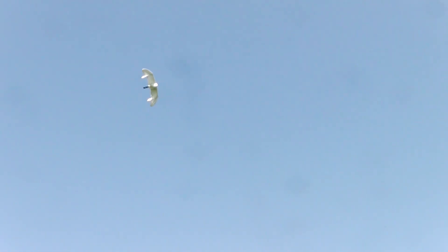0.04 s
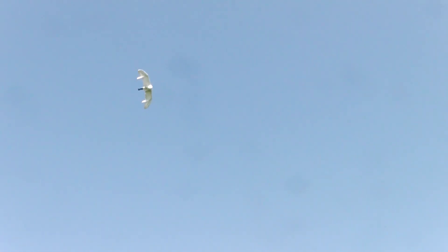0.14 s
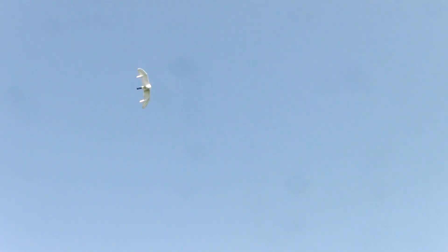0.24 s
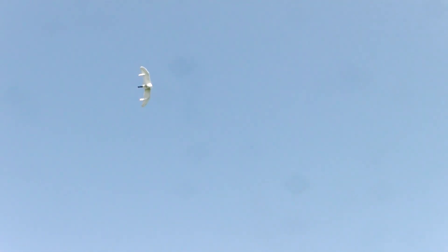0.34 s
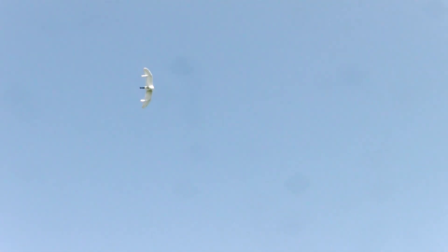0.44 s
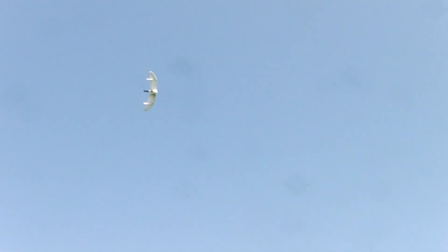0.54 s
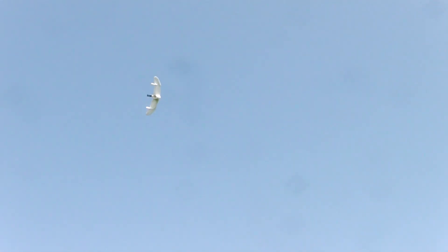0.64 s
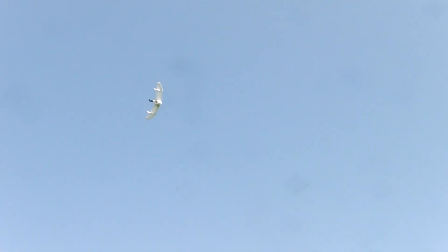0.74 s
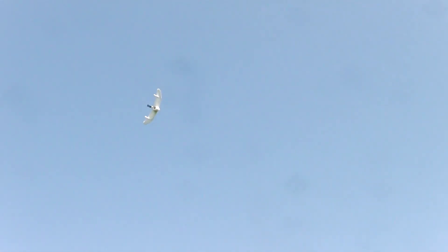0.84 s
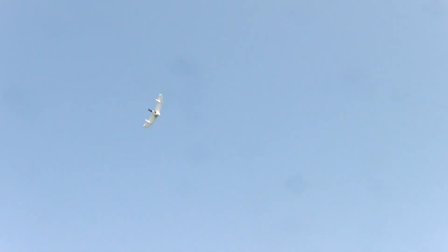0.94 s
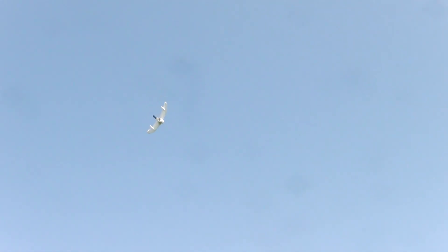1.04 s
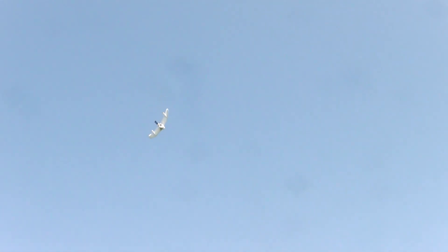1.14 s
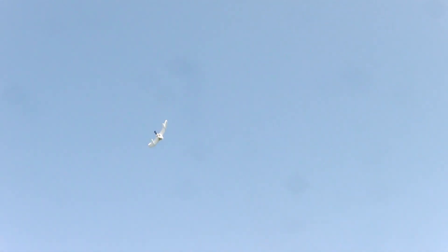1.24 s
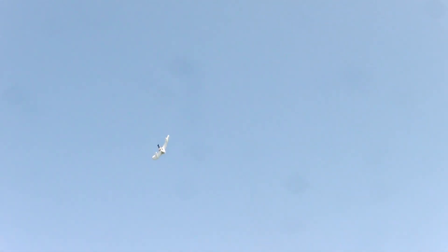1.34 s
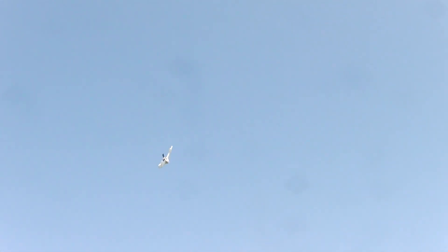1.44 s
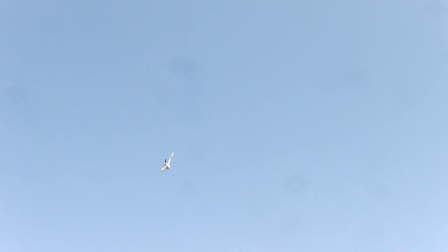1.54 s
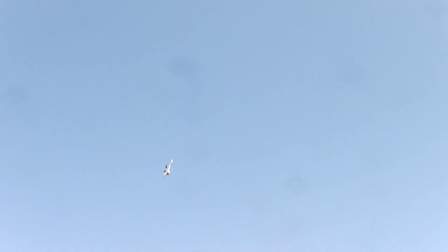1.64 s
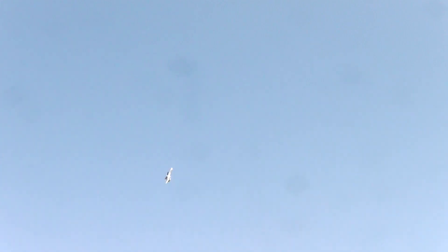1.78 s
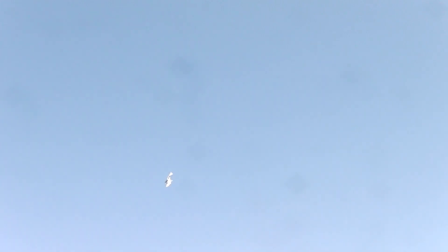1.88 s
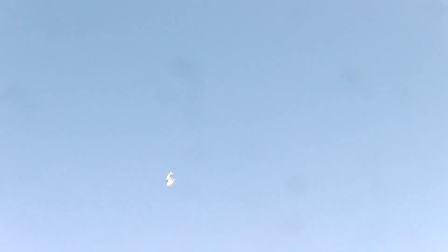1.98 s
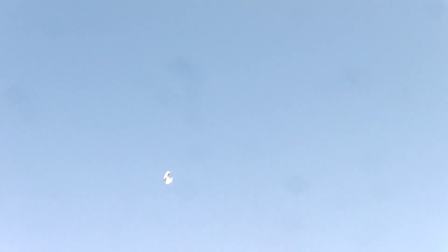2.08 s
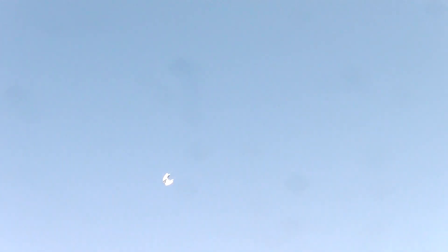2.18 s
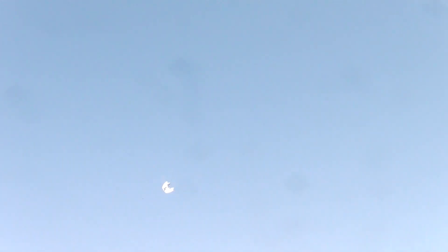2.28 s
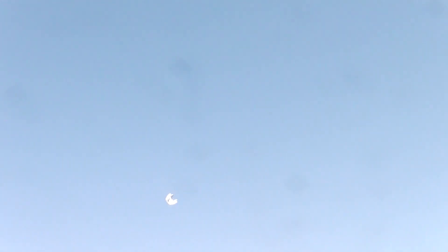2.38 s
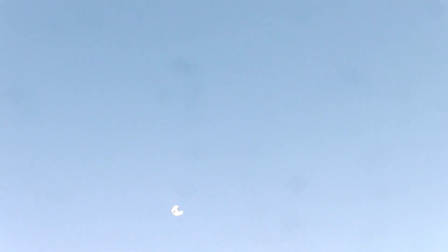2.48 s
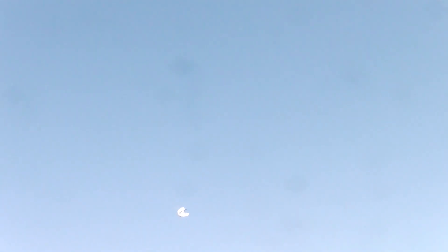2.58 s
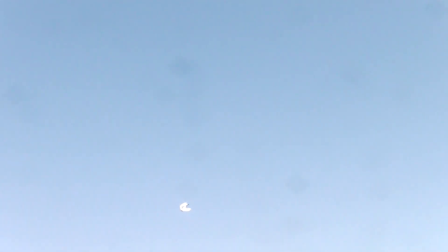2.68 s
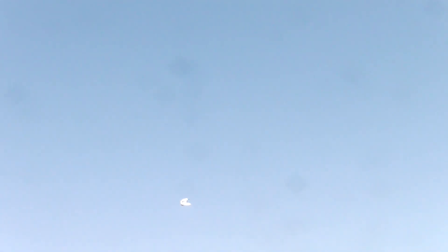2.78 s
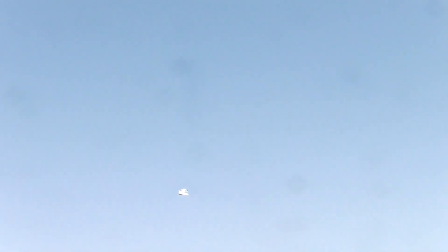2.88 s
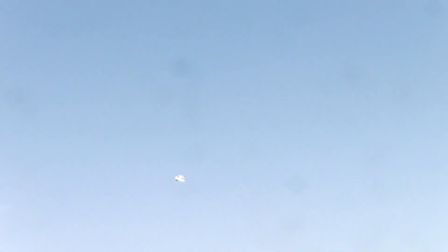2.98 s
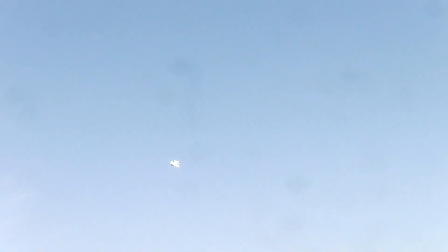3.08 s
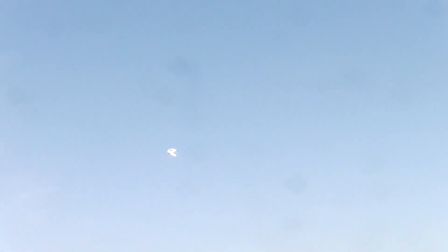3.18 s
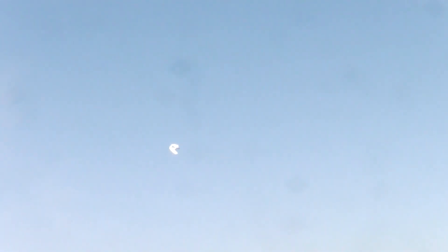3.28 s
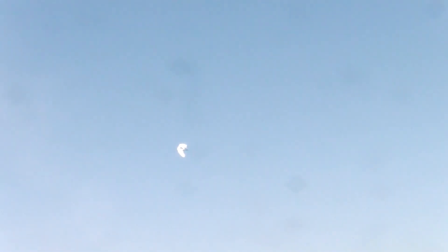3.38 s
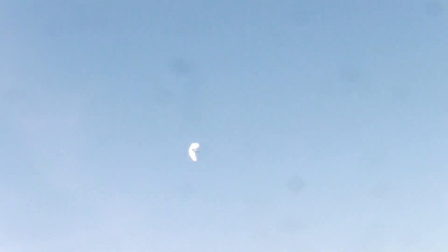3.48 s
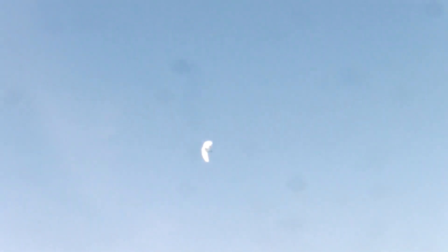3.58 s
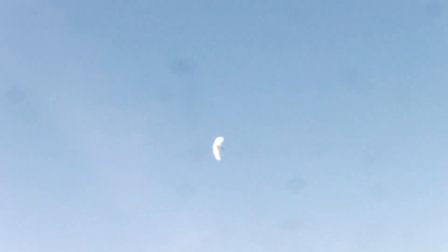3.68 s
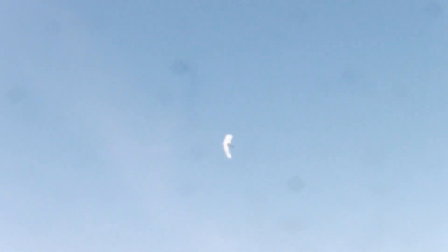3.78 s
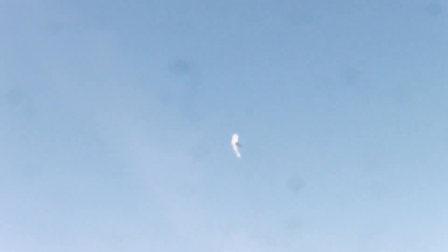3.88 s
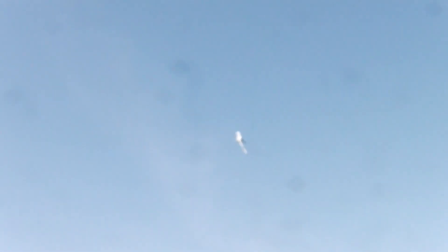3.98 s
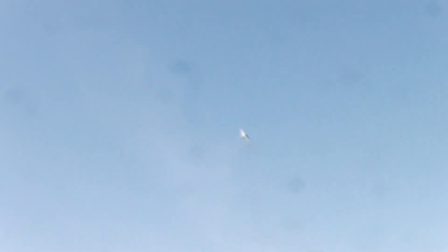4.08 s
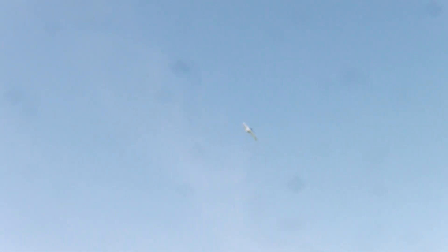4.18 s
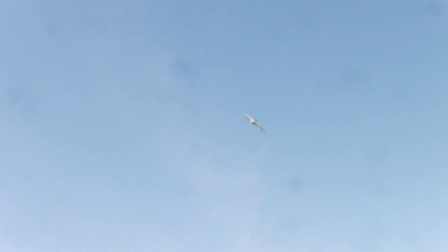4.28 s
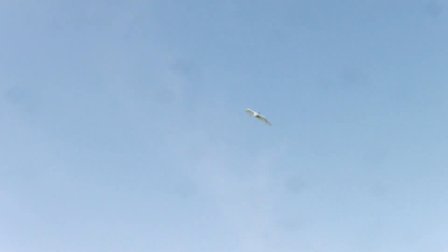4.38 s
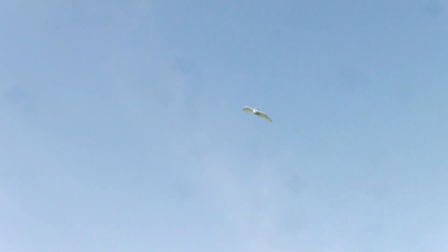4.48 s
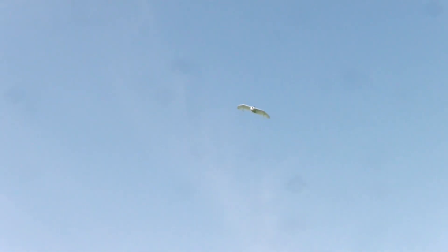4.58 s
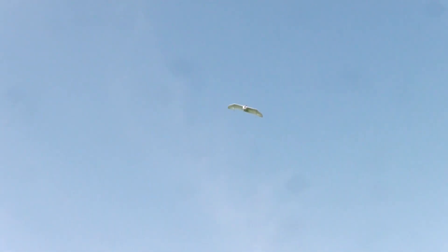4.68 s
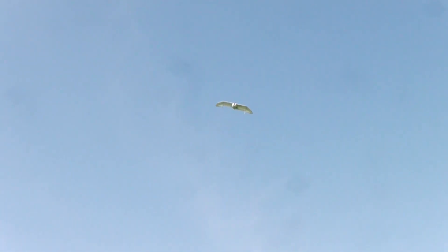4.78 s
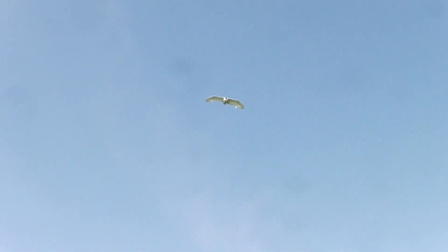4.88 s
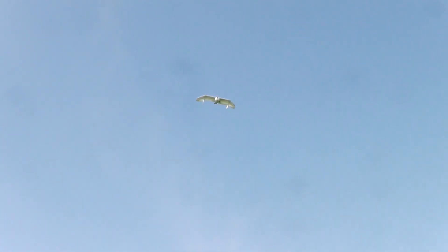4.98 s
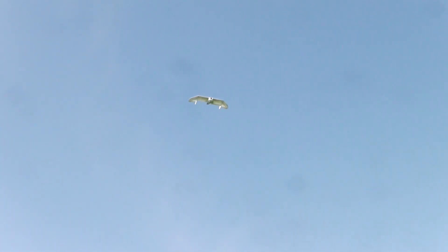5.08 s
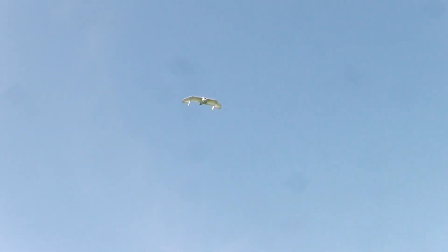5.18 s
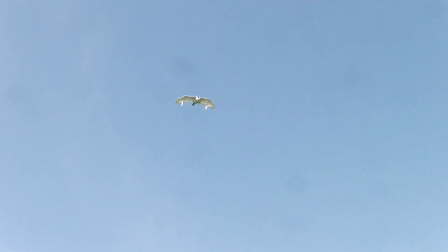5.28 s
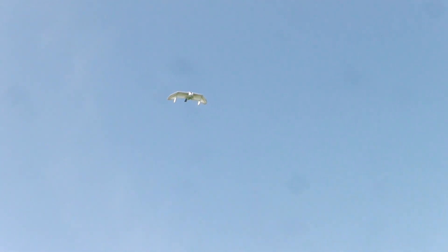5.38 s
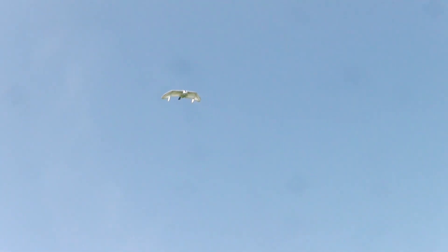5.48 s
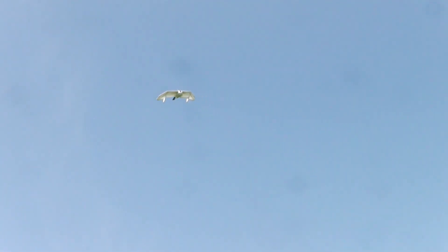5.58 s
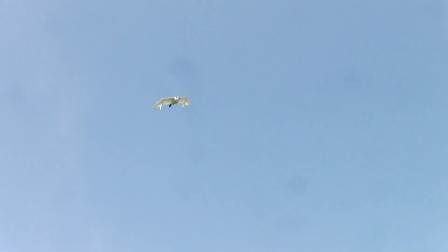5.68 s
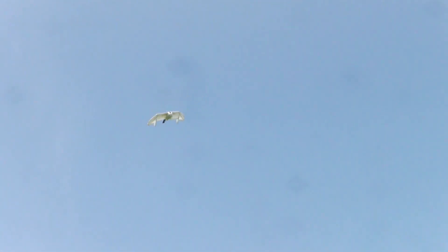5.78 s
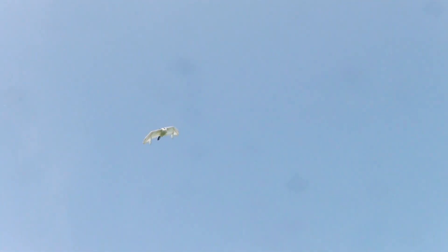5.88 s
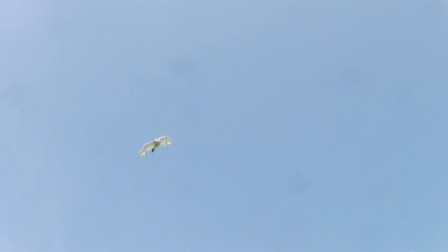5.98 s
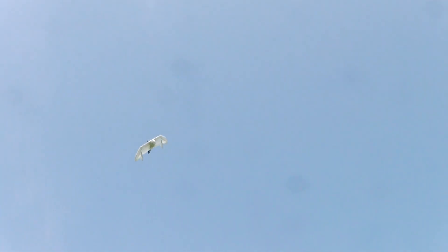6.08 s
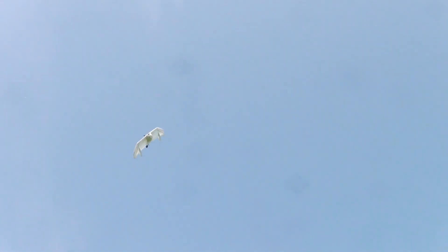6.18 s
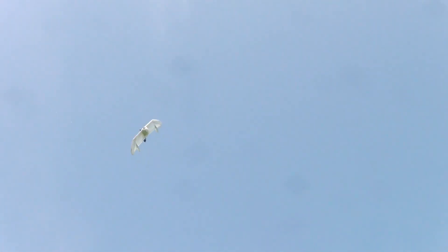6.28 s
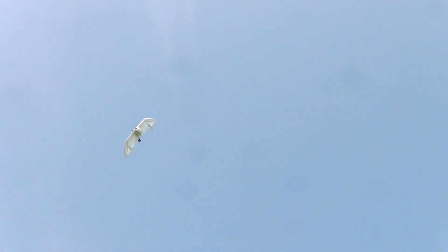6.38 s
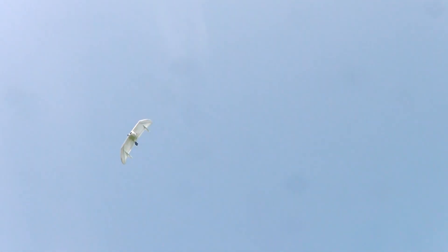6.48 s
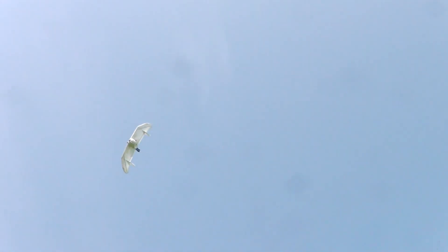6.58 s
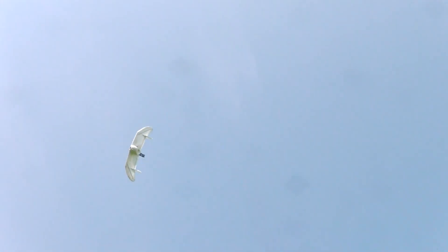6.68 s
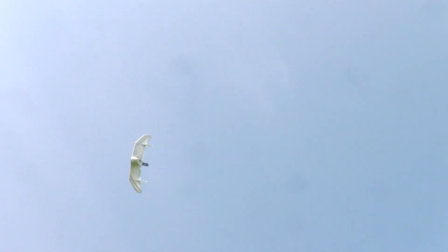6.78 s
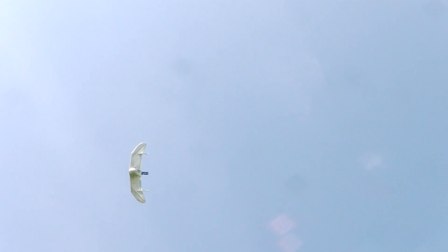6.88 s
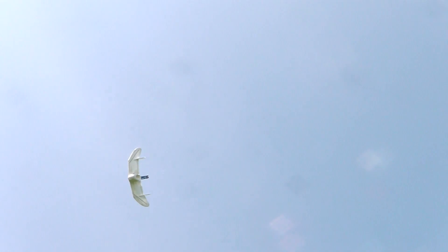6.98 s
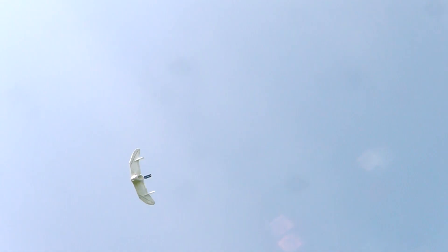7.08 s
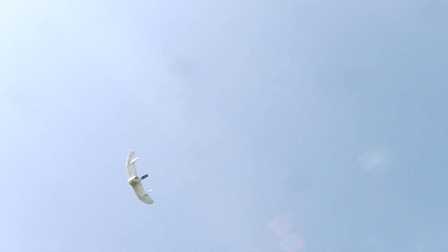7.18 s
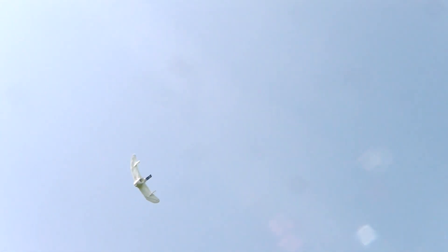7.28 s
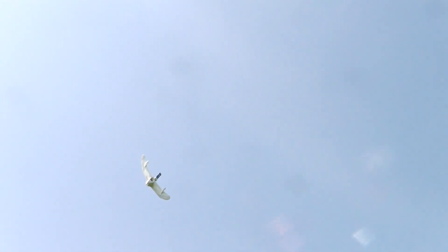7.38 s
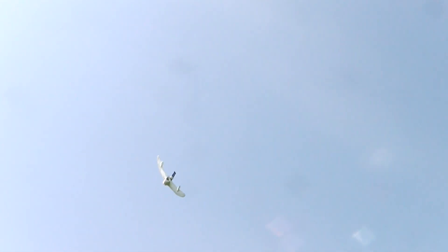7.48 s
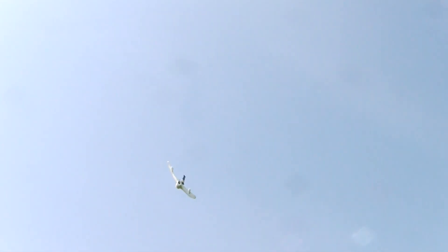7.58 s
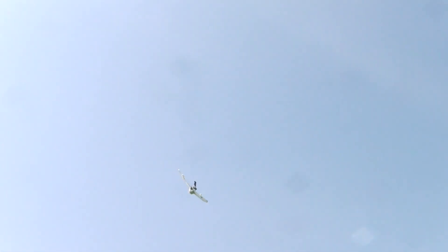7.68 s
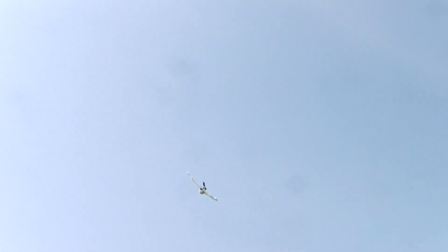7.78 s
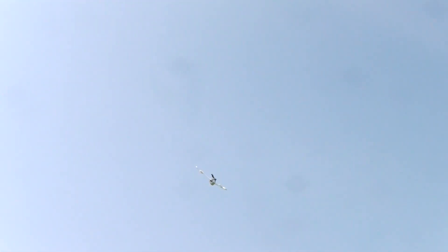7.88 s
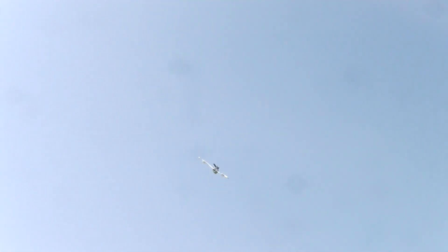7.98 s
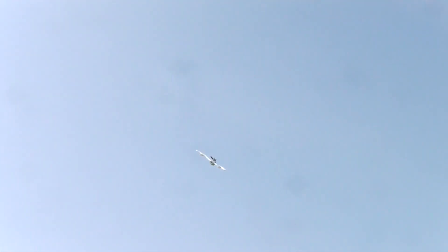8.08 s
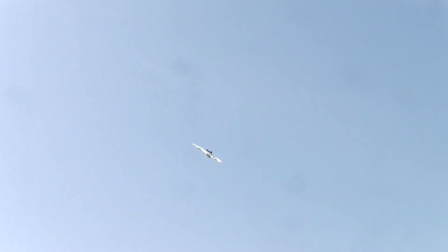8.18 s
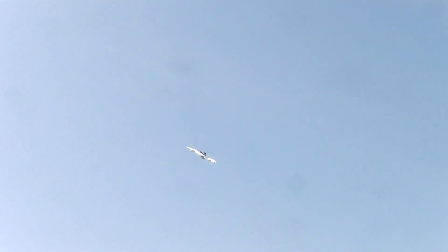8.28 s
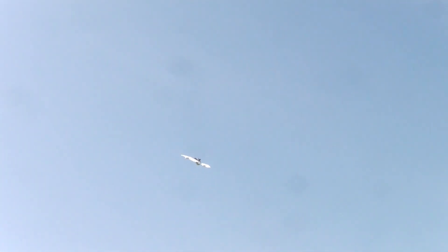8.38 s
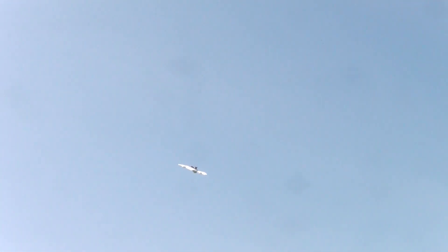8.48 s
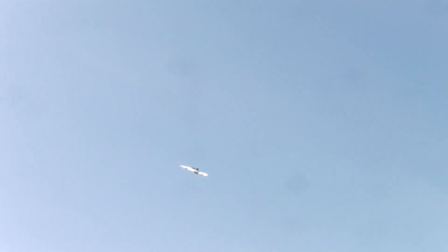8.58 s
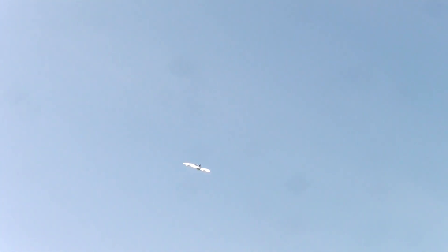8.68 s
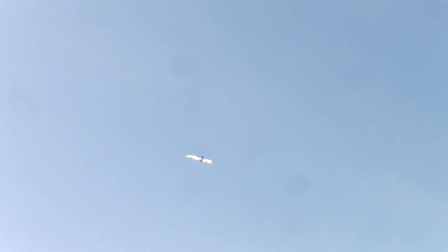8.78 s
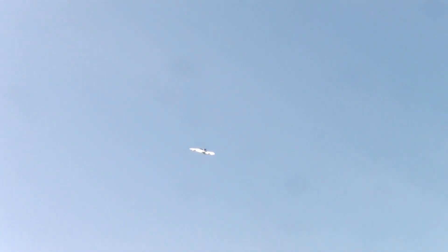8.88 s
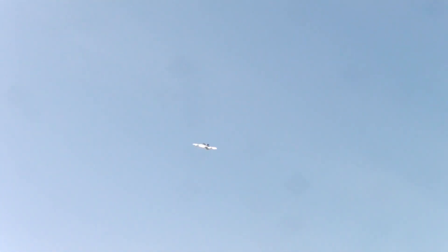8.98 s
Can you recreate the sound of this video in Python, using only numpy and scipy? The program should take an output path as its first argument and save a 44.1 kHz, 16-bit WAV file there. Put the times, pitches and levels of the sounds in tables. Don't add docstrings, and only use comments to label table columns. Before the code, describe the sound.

A small electric ducted-fan model aircraft flies circles over a meadow, heard from a low stereo microphone. From 0 to 1.6 seconds a steady mid-pitched whine, with a low hum and overtones, rides on airy roar and bright hiss. By 2 seconds it sags and thins; at about 2.2 it sweeps quickly upward, staying higher but fairly soft, with a small dip near 3.4. From 4 seconds it settles slightly lower and swells, hum, whine and hiss strongest around 6.5 to 7.4. Its ground reflection gives the rush a shifting hollow colour. Pitch then slides down, levels briefly near 8.2, and from 8.45 the motor runs down, fading by 9. A lark whistles short repeated high phrases from 0.6 to 4 seconds, then rapid chirps and trills from 7.9. Six faint hoarse rising calls come between 7.8 and 9. Distant traffic drones throughout.

```python
import sys
import numpy as np
from scipy import signal
from scipy.fft import rfft, irfft, next_fast_len
from scipy.io import wavfile
from scipy.ndimage import uniform_filter1d, map_coordinates

SR = 44100
rng = np.random.default_rng(int(sys.argv[2]) if len(sys.argv) > 2 else 0)


def pcm_store(signal):
    levels = np.round(np.clip(np.atleast_2d(signal), -1, 1) * 32767)
    wavfile.write(sys.argv[1], SR, levels.astype(np.int16).T)


def ratio_of_db(decibels):
    return 10 ** (np.asarray(decibels, float) / 20)


N = 399105

# pitch_hz, density_db (per Hz)
TRAFFIC_SPECTRUM = [(20, -14), (38, -7), (55, -6), (68, -2.5), (85, -10.5), (150, -20.5), (190, -23.5),
                    (600, -32), (2000, -23.5), (2600, -48), (5000, -46), (15700, -54)]
# time_s, level_db
FAR_CALLS = [
    (7.85, -44),
    (8.051, -44),
    (8.275, -43.5),
    (8.485, -42),
    (8.699, -42),
    (8.899, -43),
]

# time_s (from its start), pitch_hz
SLIDE = [(0, 6600), (.025, 5800), (.1, 5150), (.165, 4750), (.2, 4300)]
PEAK = [(0, 5750), (.024, 5600), (.035, 6250)]
RISE = [(0, 4550), (.012, 5200), (.045, 6500)]
ARCH = [(0, 4200), (.01, 5000), (.024, 5200), (.038, 6250), (.06, 5400), (.07, 4000)]
HOOK = [(0, 5400), (.008, 6250), (.015, 6400), (.025, 5950)]
SWOOP = [(0, 5600), (.026, 5330), (.048, 6900), (.062, 5900), (.08, 5300), (.087, 4300)]
DROP = [(0, 6000), (.014, 4900)]
TURN = [(0, 5400), (.008, 5700), (.015, 3800), (.02, 4900), (.04, 3900)]
STAIR = [(0, 5900), (.006, 6300), (.014, 6350), (.024, 6100), (.03, 5100)]
CURL = [(0, 5000), (.03, 4450), (.045, 4700), (.062, 5900), (.098, 4300)]
HOLD = [(0, 6200), (.01, 6400), (.025, 6350)]
FALL = [(0, 6400), (.012, 5700), (.032, 5100)]
# syllable, start_s, repeats, spacing_s, pitch_ratio, ratio_per_repeat
SONG = [(SLIDE, 1.62, 3, .282, 1, 1), (PEAK, 2.456, 4, .142, 1, 1), (FALL, 2.506, 4, .142, 1, 1),
        (RISE, 3.028, 8, .0928, 1, 1), (RISE, 3.78, 3, .1, 1, 1), (CURL, .645, 3, .152, 1, 1),
        (STAIR, 7.9, 1, 0, 1.1, 1), (HOLD, 7.935, 1, 0, 1, 1), (ARCH, 8.068, 1, 0, 1, 1),
        (HOOK, 8.195, 1, 0, 1.04, 1), (HOOK, 8.225, 6, .0304, 1, .974), (RISE, 8.468, 1, 0, .9, 1),
        (SWOOP, 8.487, 1, 0, 1, 1), (DROP, 8.623, 4, .0147, 1, 1), (HOLD, 8.678, 1, 0, 1, 1),
        (TURN, 8.7, 1, 0, 1, 1), (STAIR, 8.937, 1, 0, 1, 1), (HOOK, 8.965, 3, .02, .9, .93),
        (HOLD, 9.025, 1, 0, .645, 1)]
SONG_DB = [-45, -41, -42, -41, -42, -46, -58, -43, -41, -50, -42.5, -48, -38, -40, -44, -41, -45.5, -43.5,
           -46]
# start_s, length_s, start_hz, end_hz, swing_hz, beat_hz, level_db
TRILLS = [
    (7.968, .048, 6150, 5900, 250, 330, -46),
    (8.777, .102, 4450, 4450, 750, 95, -42),
    (8.88, .07, 3000, 4500, 400, 300, -54),
]

# time_s, roar_db, hump_db, wake_db, jet_db
AIR_LEVELS = [(0.0, -46.5, -48, -44.5, -44), (0.31, -47.5, -40, -43.5, -39.5),
              (0.73, -46.5, -43, -43, -40.5), (1.36, -52.5, -46, -43, -40.5), (1.67, -52, -49, -46, -48.5),
              (1.88, -57, -54, -51.5, -55.5), (2.09, -56.5, -51, -55, -56), (2.3, -53, -56, -46, -50),
              (2.61, -51.5, -70, -47, -47.5), (3.03, -48.5, -73, -43, -47), (3.34, -59, -66, -49.5, -48.5),
              (3.66, -51, -67, -45, -46.5), (3.76, -48, -57, -47, -46), (3.97, -51.5, -57, -40.5, -40),
              (4.39, -50.5, -46.5, -38.5, -37), (5.02, -46.5, -42.5, -37, -37.5),
              (6.69, -43, -42, -38, -35.5), (6.9, -39.5, -63, -37.5, -36.5), (7.31, -43.5, -42, -43, -36.5),
              (7.52, -46.5, -44, -40, -38.5), (7.84, -56.5, -55, -46, -42.5), (8.15, -56.5, -57, -49, -52),
              (8.36, -56, -57, -47.5, -48), (8.57, -61, -55, -50, -53), (8.67, -53, -60, -55, -61),
              (8.88, -64, -63, -59, -63), (8.99, -70, -67, -62, -68)]
# time_s, lag_ms
GROUND_ECHO = [(0, 6.7), (1, 6.34), (1.6, 5.6), (2.3, 3.56), (3.3, 2.8), (4, 4.08), (4.8, 4.93),
               (5.6, 6.85), (6.3, 8), (6.9, 8.9), (8, 5.33), (9.05, 4.2)]
# pitch_hz, density_db (per Hz)
ROAR_SPECTRUM = [(150, -24.5), (260, -6.5), (600, 1), (1100, -3), (2000, -6.5), (2600, -17.5), (3300, -17)]
# pitch_hz, density_db (per Hz)
WAKE_SPECTRUM = [(2300, -14.5), (3300, -14.5), (4300, -2), (5800, -0.5), (7000, -7), (8500, -9)]
# pitch_hz, density_db (per Hz)
JET_SPECTRUM = [(6000, -24), (7500, -5.5), (9000, -2.5), (10800, -2.5), (12500, -11.5), (15700, -19)]
# time_s, turns_hz
SHAFT_SPEED = [(0.0, 370.7), (0.53, 369.1), (0.8, 365.0), (1.62, 361.1), (1.66, 355.6), (1.74, 339.7),
               (1.78, 334.5), (1.89, 325.1), (1.95, 322.5), (2.09, 322.4), (2.15, 324.2), (2.17, 327.0),
               (2.19, 332.3), (2.22, 342.9), (2.26, 359.9), (2.33, 398.6), (2.35, 407.7), (2.38, 418.1),
               (2.43, 431.7), (2.45, 435.2), (2.52, 442.8), (2.65, 448.1), (2.78, 447.1), (2.87, 448.9),
               (3.05, 446.4), (3.09, 444.5), (3.21, 434.6), (3.38, 430.6), (3.54, 432.7), (3.67, 446.0),
               (3.74, 450.4), (3.93, 451.0), (3.95, 449.7), (4.02, 437.8), (4.11, 432.3), (4.21, 430.1),
               (4.46, 428.5), (4.58, 422.3), (4.69, 419.7), (4.87, 422.2), (5.78, 419.3), (5.87, 421.2),
               (6.25, 420.3), (6.36, 423.1), (6.56, 423.8), (6.83, 422.1), (6.86, 420.0), (6.94, 404.7),
               (7.09, 390.8), (7.18, 386.3), (7.48, 378.3), (7.61, 362.1), (7.7, 342.3), (7.74, 335.4),
               (7.82, 325.6), (7.9, 318.6), (8.01, 312.7), (8.13, 309.3), (8.31, 308.6), (8.42, 309.7),
               (8.45, 306.5), (8.47, 300.6), (8.56, 266.9), (8.64, 232.6), (8.67, 221.2), (8.7, 211.4),
               (8.77, 194.7), (8.86, 176.0), (9.02, 146.0), (9.04, 143.1)]
# time_s, order1_db, order2_db, order3_db, order4_db, order5_db, order10_db, order15_db, order20_db
TONE_LEVELS = [(0.0, -34, -43, -43, -37.5, -42, -57, -43, -49),
               (0.09, -31, -39.5, -44, -40, -34, -53.5, -52, -50),
               (0.45, -32, -36, -47, -49, -27, -46, -50, -49),
               (0.57, -32, -35.5, -44, -70, -29, -55, -50, -45),
               (0.66, -30, -33.5, -55, -49, -33, -61, -52, -51),
               (0.84, -28, -38, -48, -41.5, -33, -52, -43, -43),
               (0.96, -26, -41, -46, -38, -50, -49, -57, -43.5),
               (1.14, -26, -43, -51, -37.5, -34, -46, -42.5, -47),
               (1.32, -27, -52, -55, -47, -51, -51, -41.5, -54),
               (1.44, -31, -46, -45, -38.5, -34, -53, -46, -49),
               (1.62, -39, -40.5, -47, -45, -43, -67, -48, -52),
               (1.68, -40, -45.5, -59, -48, -37, -66, -49, -52),
               (1.86, -52, -35.5, -50, -54, -45, -64, -66, -64),
               (1.95, -70, -37, -58, -46, -59, -59, -54, -63),
               (2.07, -54, -39, -45, -70, -48, -54, -53, -58),
               (2.16, -52, -37.5, -46, -55, -58, -69, -68, -68),
               (2.25, -64, -40, -44.5, -55, -46, -57, -50, -59),
               (2.37, -40, -46, -54, -43, -52, -45, -48, -50),
               (2.43, -39, -40, -47.5, -48, -53, -49, -56.5, -50),
               (2.97, -41, -43, -48, -49, -51, -44, -45, -53),
               (3.15, -52, -47, -45.5, -49, -46, -45.5, -63, -70),
               (3.36, -46, -61, -41.5, -51, -47, -49, -49, -59),
               (3.54, -37, -38, -52, -57, -50, -52, -63, -66),
               (3.63, -37, -42, -49, -46, -61, -46.5, -51, -48),
               (3.87, -42, -68, -40.5, -44, -60, -44.5, -45, -61),
               (4.14, -32, -63, -57, -44, -47, -44, -50, -48),
               (4.23, -31, -55, -54, -46, -60, -40, -39, -43),
               (4.53, -24, -44.5, -45.5, -45, -43, -45, -53, -34),
               (4.68, -21, -52, -46, -41, -44, -43, -52, -42.5),
               (4.8, -20, -65, -65, -53, -44, -47, -43, -37),
               (4.98, -20, -63, -41.5, -43, -48, -46.5, -46, -44),
               (5.19, -31, -46, -39.5, -53, -36, -47, -48, -40),
               (5.28, -30, -39, -51, -46, -44, -47, -45, -42),
               (5.43, -24, -40, -50, -48, -34, -43.5, -42, -52),
               (5.55, -24, -49, -41.5, -62, -42, -42, -41, -52),
               (5.67, -26, -51, -44, -41, -33, -44.5, -44, -42),
               (5.82, -28, -42, -48, -47, -43, -41, -42, -41),
               (5.91, -30, -40, -39.5, -40, -33, -40, -42, -38),
               (6.12, -40, -54, -41, -39, -33, -45, -40, -38),
               (6.3, -32, -40, -47, -38, -38, -44.5, -40, -36.5),
               (6.39, -30, -38, -40, -48, -36, -38, -39, -33),
               (6.48, -26, -29.5, -47, -45, -37, -39.5, -37, -51),
               (6.57, -23, -38, -37, -68, -32, -37, -49, -43),
               (6.69, -20, -39.5, -34.5, -47, -31, -36, -37, -41),
               (6.78, -18, -40, -32.5, -45, -30, -39, -50, -37),
               (6.9, -21, -42, -43, -35, -35, -39.5, -41, -42),
               (6.99, -35, -46, -42, -40, -37, -49, -52, -41),
               (7.11, -19, -48, -49, -34, -40, -45, -47, -48),
               (7.23, -16, -42, -66, -37.5, -36, -51, -48, -41),
               (7.29, -17, -38, -46, -35, -27, -45, -50, -38),
               (7.35, -18, -48, -43, -35, -28, -45, -53, -43),
               (7.38, -19, -39, -41, -42, -34, -43, -51, -48),
               (7.44, -22, -53, -43, -37, -27, -43, -46, -52),
               (7.59, -43, -42, -41.5, -32.5, -45, -40.5, -46, -46),
               (7.74, -39, -45.5, -39, -51, -52, -53, -49, -47.5),
               (7.95, -38, -46, -49, -48, -58, -64, -48.5, -58),
               (8.31, -39, -42.5, -59, -49, -70, -67, -64, -58),
               (8.43, -38, -46.5, -58, -47, -58, -64, -64, -70),
               (8.7, -61, -49, -55, -65, -50, -67, -71, -70),
               (9.04, -63, -76, -74, -53, -70, -68, -70, -74)]


def unit(x):
    return x / np.sqrt(np.mean(x ** 2) + 1e-20)


def curves(rows):
    s, *cols = np.transpose(rows)
    return [np.interp(np.arange(N) / SR, s, c) for c in cols]


def wobble(rate):
    knots = rng.standard_normal(int(N * rate / SR) + 4)
    return map_coordinates(knots, [np.arange(N) * rate / SR])


def coloured(x, spectrum):
    m = next_fast_len(N + 8192)
    hz, db = np.transpose(spectrum)
    log_hz = np.log(np.fft.rfftfreq(m, 1 / SR) + 1)
    gain = ratio_of_db(np.interp(log_hz, np.log(hz), db, -120, -120))
    return irfft(rfft(x, m) * gain, m)[..., :N]


def rush(spectrum, patchy_db=0):
    z = signal.stft(rng.standard_normal(N + 512), nperseg=512)[2]
    field = uniform_filter1d(rng.standard_normal(z.shape), size=7, axis=0)
    field = uniform_filter1d(field, size=30, axis=1)
    noise = signal.istft(z * ratio_of_db(patchy_db * unit(field)), nperseg=512)[1][:N]
    return unit(coloured(noise, spectrum))


def sweep(hz):
    return np.sin(2 * np.pi * np.cumsum(hz) / SR)


def add(out, s, note):
    part = out[round(s * SR):][:len(note)]
    part += note[:len(part)]


def traffic():
    t = np.arange(N) / SR
    notes = np.zeros(N)
    for hz, db in ((55, -4), (66, -3.5), (95, -16), (130, -16.5), (147, -15)):
        size = ratio_of_db(db + 3.8 * wobble(4))
        notes += size * np.sin(2 * np.pi * hz * t + 2.04 * wobble(3))
    return ratio_of_db(-46 + wobble(1.57)) * (rush(TRAFFIC_SPECTRUM) + notes)


def far_bird():
    out = np.zeros(N)
    t = np.arange(round(.08 * SR)) / SR
    phase = 2 * np.pi * np.cumsum(1620 + 4000 * t) / SR
    voice = np.sin(phase) + 0.44 * np.sin(2 * phase)
    for s, db in FAR_CALLS:
        grit = unit(np.convolve(rng.standard_normal(len(t)), np.hanning(200), "same"))
        add(out, s - .02, ratio_of_db(db) * np.hanning(len(t)) * grit * voice)
    return out


def lark_phrases(out):
    for (shape, first, count, gap, ratio, drift), db in zip(SONG, SONG_DB):
        s, hz = np.transpose(shape)
        t = np.arange(round(s[-1] * SR)) / SR
        path = uniform_filter1d(np.interp(t, s, hz), size=120, mode="nearest")
        for n in range(count):
            size = ratio_of_db(db + rng.normal(0, 1.5)) * signal.windows.tukey(len(t), .25)
            if shape == SLIDE:
                steps = 1 + .4 * np.sin(2 * np.pi * 49 * t)
                hoarse = unit(uniform_filter1d(rng.standard_normal(len(t)) + .13, size=110))
                size = size * ratio_of_db(-2.5 * n) * steps * hoarse
            add(out, first + n * gap, size * sweep(path * ratio * drift ** n))


def lark_trills(out):
    for s, length, a_hz, b_hz, swing_hz, rate, db in TRILLS:
        t = np.arange(round(length * SR)) / SR
        beat = 2 * np.pi * rate * t
        path = a_hz + (b_hz - a_hz) * t / length + swing_hz * np.sin(beat + .5)
        fade = .65 - 0.25 * np.cos(beat)
        add(out, s, ratio_of_db(db) * signal.windows.tukey(len(t), .15) * fade * sweep(path))


def lark():
    out = np.zeros(N)
    lark_phrases(out)
    lark_trills(out)
    return out


def fan_air(turns):
    roar_db, hump_db, wake_db, jet_db = curves(AIR_LEVELS)
    gust = wobble(3.01)
    hump = unit(rush([(5, 5), (120, 1.5), (400, -22)]) * np.sin(2 * np.pi * 4.1 * turns))
    low = ratio_of_db(roar_db + 2.44 + 1.0 * gust) * rush(ROAR_SPECTRUM)
    low = low + ratio_of_db(hump_db - 2.5 + 0.76 * gust) * hump
    lag_ms, = curves(GROUND_ECHO)
    low = low + 0.54 * np.interp(np.arange(N) - lag_ms * SR / 1000, np.arange(N), low)

    chop = (1 + 0.16 * np.sin(2 * np.pi * turns)) * ratio_of_db(0.58 * gust + 0.84 * wobble(60))
    hiss = []
    for port in range(2):
        wake = ratio_of_db(wake_db - 1.5) * rush(WAKE_SPECTRUM, patchy_db=1.5)
        jet = ratio_of_db(jet_db + 1.5) * rush(JET_SPECTRUM, patchy_db=1.55)
        hiss.append(chop * (wake + jet))
    spread = [(3000, -21), (8000, -17.5), (11000, -12.5), (15700, -3)]
    return low + hiss[0], coloured(hiss[1] - 0.21 * hiss[0], spread)


def tone_strengths():
    speed, jet_db = curves(SHAFT_SPEED)[0], curves(AIR_LEVELS)[-1]
    levels = dict(zip((1, 2, 3, 4, 5, 10, 15, 20), curves(TONE_LEVELS)))
    levels[6] = levels[4] - 8
    levels[8] = levels[10] - 8
    levels[25] = jet_db - 12.5 + 4 * wobble(3.01)
    levels[30] = jet_db - 24
    for k in (6, 8):
        levels[k] = levels[k] - 12 * np.exp(-((k * speed - 2900) / 700) ** 2)
    for blade, db in ((10, -10.5), (15, -9.5), (20, -11), (25, -13)):
        smooth = uniform_filter1d(levels[blade], size=SR // 2) + db
        for step in (-2, -1, 1, 2):
            levels[blade + step] = smooth - 6 * (abs(step) - 1) + 4 * wobble(3.086)
    return levels


def fan_whine(turns):
    mid, side = np.zeros((2, N))
    for k, db in tone_strengths().items():
        shake = min(k, 12) ** .5
        size = np.sqrt(2) * ratio_of_db(db + 0.76 * shake * wobble(22))
        phase = 2 * np.pi * k * turns + .02 * k * wobble(30) + .25 * shake * wobble(9)
        mid += size * np.sin(phase)
        port_gap = ratio_of_db(-28) * shake * wobble(1.19)
        side += port_gap * size * np.sin(phase + rng.uniform(0, np.pi))
    return mid, side


def scene():
    turns = np.cumsum(curves(SHAFT_SPEED)[0]) / SR
    birds = lark()
    hiss, hiss_side = fan_air(turns)
    tones, tones_side = fan_whine(turns)
    mid = tones + hiss + birds + far_bird() + traffic()
    side = tones_side + hiss_side - ratio_of_db(-16) * birds + ratio_of_db(-74.5) * rush(TRAFFIC_SPECTRUM)
    return np.array([mid + side, mid - side])


def top_cut(x):
    return signal.sosfilt(signal.butter(12, 15750, fs=SR, output="sos"), x)


def record(dry):
    return top_cut(dry)


dry = scene()
out = record(dry)
pcm_store(out)
```